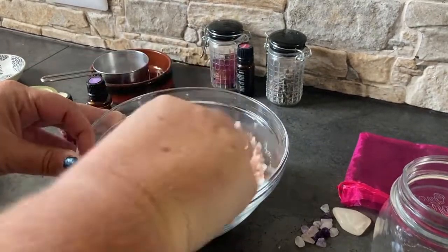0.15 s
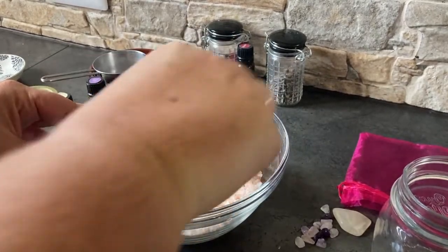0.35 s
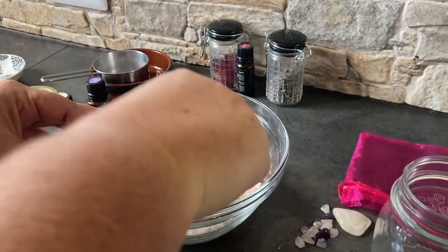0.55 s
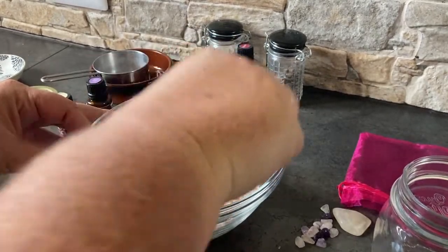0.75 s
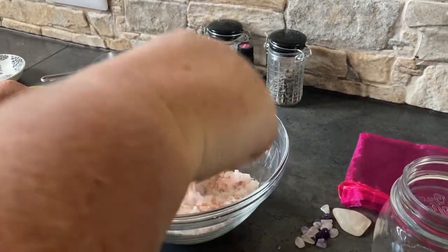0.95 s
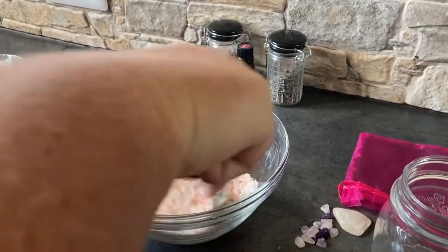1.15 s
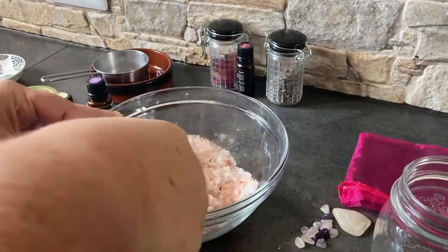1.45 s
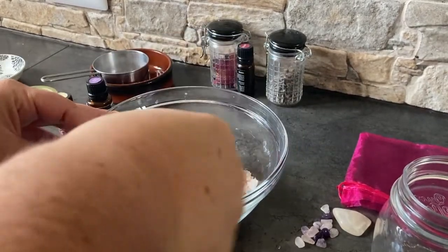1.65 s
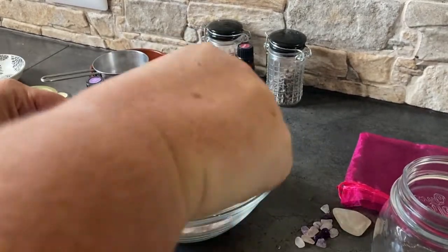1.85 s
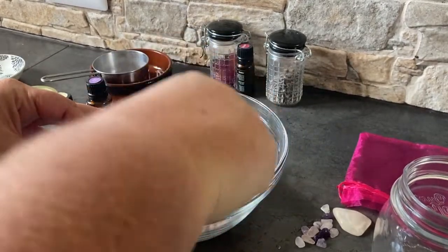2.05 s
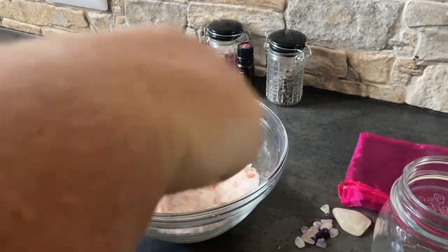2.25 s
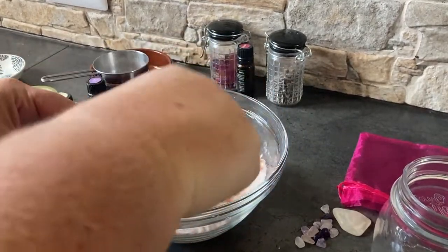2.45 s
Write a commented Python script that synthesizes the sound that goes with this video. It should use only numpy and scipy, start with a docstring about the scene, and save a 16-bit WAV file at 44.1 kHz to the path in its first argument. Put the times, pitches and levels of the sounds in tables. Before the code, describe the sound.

Coarse salt is stirred by hand in a glass bowl. A hard crunch with clustered knocks comes at 0.1 s, then grinding pushes near 0.5 and 0.8 s. Around 1.0-1.3 s crystals hiss and scrape the glass with short damped rings. A dull thud lands at 1.5 s, softer crunches at 2.0 and 2.3 s. Close, dry stereo, small room, faint rumble.

```python
"""Coarse salt stirred in a glass bowl

A hand stirs salt on a kitchen counter, about three strokes a second. Each push makes the packed salt
crunch low: random grain slips drive the bowl's resonances. Now and then it gives way with a thud, a smooth
pulse into the same resonances. Loose crystals hiss and tick (shaped noise and grains); those dragged along
the wall ring damped glass modes. A faint rumble, a sagging tone, air noise and a small room lie behind."""
import sys
import numpy as np
from scipy import signal
from scipy.fft import rfft, irfft
from scipy.io import wavfile

SR = 44100
rng = np.random.default_rng(int(sys.argv[2]) if len(sys.argv) > 2 else 0)


def generate_wav(signal):
    """Clip the signal to [-1, 1] and save it as 16-bit WAV at the path in sys.argv[1]."""
    frames = np.transpose(np.atleast_2d(signal))
    scaled = np.clip(frames, -1, 1) * 32767
    pcm = np.round(scaled).astype(np.int16)
    wavfile.write(sys.argv[1], SR, pcm)


N = 114660
SIZE = 2 ** 17  # FFT length, samples
FREQS_HZ = np.arange(SIZE // 2 + 1) * SR / SIZE
TIME_S = np.arange(N) / SR

# All levels are relative: later gains apply.
# air noise spectrum [f/Hz, density/dB]
AIR_SPECTRUM = [(20, -17), (80, -37), (250, -12), (1000, -6), (3000, -28), (16000, -21)]
# low rumble of bowl on counter [t/s, level/dB]
RUMBLE_LEVEL = [(0.0, -53), (0.03, -46), (0.15, -45), (0.35, -86), (0.4, -52.5), (0.46, -42), (0.51, -43),
                (0.66, -66.5), (0.72, -55), (0.83, -41), (0.92, -96), (0.98, -47.5), (1.04, -53),
                (1.11, -50), (1.18, -46), (1.3, -50.5), (1.32, -54), (1.38, -52), (1.49, -43.5),
                (1.61, -52), (1.77, -60.5), (1.82, -83), (1.88, -64), (1.95, -49.5), (2.01, -41),
                (2.04, -52), (2.07, -42), (2.19, -76), (2.27, -38), (2.32, -37), (2.53, -65), (2.6, -42.5)]
# rumble spectrum [f/Hz, density/dB]
COUNTER_SPECTRUM = [(20, -43), (42, -24.5), (68, -3), (90, -10.5), (130, -10), (400, -26), (2000, -123)]
# brief low tone: one row [centre t/s, f/Hz, glide/(Hz/s), half length/s, level/dB]
LOW_TONE = (.965, 114, -130, .035, -50)
# glass rubbed by salt [t/s, level/dB]
RUB_LEVEL = [(0, -52.5), (.3, -70), (.98, -87), (1.03, -43), (1.18, -43.5), (1.22, -46.5), (1.3, -62),
             (1.35, -57), (1.44, -53), (1.55, -60), (1.68, -62), (1.8, -51.5), (2.0, -65), (2.25, -58),
             (2.6, -80)]
# crystals catch on the glass wall [t/s, level/dB, length/s]
WALL_SCRAPES = [(.062, -44, 0.0061), (1.095, -31, 0.008), (1.155, -38, 0.0087), (1.254, -38.5, 0.016),
                (1.29, -31, 0.0062), (1.303, -31, 0.0035), (1.627, -45.5, 0.012), (1.738, -52, 0.011),
                (1.79, -54, 0.011), (1.83, -50, 0.014), (1.883, -48.5, 0.0031), (2.1, -56, 0.0072),
                (2.13, -48.5, 0.013)]
# a crystal taps the glass [t/s, level/dB]
GLASS_TAPS = [(1.065, -49), (1.099, -54), (1.1533, -32.5), (1.585, -58), (1.769, -50.5)]
# glass modes, damped by the salt [f/Hz, width/Hz, level/dB]
GLASS_MODES = [(1680, 55, -7.5), (2800, 200, -14), (4660, 103, 6.5), (4615, 450, -7), (6580, 69, -2),
               (7660, 200, -7)]
# lowest ring of the glass while salt drags round the wall [t/s, level/dB]
LOW_RING_LEVEL = [(0, -62.5), (1.01, -93), (1.035, -47.5), (1.17, -56), (1.22, -67), (1.315, -50),
                  (1.355, -86), (1.42, -58.5), (1.6, -66), (1.7, -72), (1.765, -64), (1.85, -97),
                  (2.6, -61)]
# its modes [f/Hz, width/Hz, level/dB]
LOW_RING_MODES = [(1650, 94, 0), (1660, 390, -4.5)]
# hiss of sliding crystals [t/s, level/dB]
SLIDE_LEVEL = [(0, -42), (.11, -41.5), (.14, -46), (.2, -46), (.28, -52.5), (.34, -72), (.374, -69),
               (.382, -44.5), (.47, -41), (.56, -52), (.615, -53), (.665, -65), (.708, -72), (.714, -38.5),
               (.775, -37.5), (.84, -45), (.96, -62.5), (1.015, -69), (1.023, -34.5), (1.08, -39.5),
               (1.12, -34.5), (1.27, -43), (1.305, -34.5), (1.325, -45), (1.56, -48.5), (1.69, -49.5),
               (1.74, -40), (1.81, -52.5), (1.89, -48.5), (1.965, -38.5), (2.06, -50.5), (2.22, -46),
               (2.295, -36.5), (2.4, -50), (2.6, -45)]
# hiss and tick spectrum [f/Hz, density/dB]
HISS_SPECTRUM = [(300, -14), (800, -9), (1500, -5), (2700, -4), (3500, -6), (4300, -5), (5500, -4),
                 (6500, -3), (7300, -2), (8200, 1.5), (8800, 7.5), (9500, 1), (10700, 1), (11300, 5.5),
                 (12100, 6.5), (13400, -5), (14600, 0), (16000, -4)]
# single crystals crack [t/s, level/dB, length/s]
CRYSTAL_TICKS = [(.1146, -46, 0.0015), (.1185, -28.5, 0.00076), (.1312, -22.5, 0.0019), (.378, -63, 0.002),
                 (.7107, -37.5, 0.0019), (.718, -44.5, 0.013), (1.021, -34, 0.0048),
                 (1.586, -38.5, 0.00081), (1.625, -43, 0.003), (1.8265, -41, 0.0023)]
# lumps shear apart as a stroke digs in [t/s, level/dB, length/s]
LUMP_SHEARS = [(.103, -42, 0.032), (.26, -64, 0.021), (.388, -53.5, 0.096), (.6, -63.5, 0.018),
               (.716, -49, 0.019), (.765, -51.5, .03), (1.945, -52.5, 0.024), (2.28, -60, 0.016)]
# resonances excited by shearing [f/Hz, width/Hz, level/dB]
SHEAR_RESONANCES = [(2754, 350, -9.5), (4200, 120, -12), (5600, 480, 1), (8350, 550, -35.5),
                    (11380, 1200, -1.5)]
# packed salt gives way and knocks the bowl [t/s, level/dB, contact/s]
SALT_THUDS = [(.1168, -24, 0.0014), (.1203, -25.5, 0.0011), (.1268, -25.5, 0.0014), (.1335, -22.5, 0.00034),
              (.137, -21.5, 0.00024), (.142, -41, 0.0046), (.802, -31, 0.00087), (.8062, -23, 0.00095),
              (.812, -28, 0.0015), (1.033, -34.5, 0.00086), (1.038, -29.5, 0.0033), (1.0512, -27.5, 0.0031),
              (1.0605, -37, 0.0025), (1.112, -31.5, 0.0021), (1.4762, -35, 0.00099), (1.4803, -20, 0.0037),
              (1.486, -21, 0.004), (1.4915, -41, 0.0072), (1.5315, -31.5, 0.0029), (1.536, -37, 0.0033),
              (1.972, -26, 0.0032), (1.9815, -31, 0.0021), (1.9915, -28, 0.0037), (2.002, -25.5, 0.0023),
              (2.011, -33, 0.0014), (2.3015, -33, 0.0012), (2.3062, -35, 0.0015), (2.3115, -35, 0.0032)]
# pushes into the salt [peak t/s, level/dB, rise/(dB/s), fall/(dB/s), grinding re push/dB]
HAND_PUSHES = [(0.134, -26.5, 414, 128, 2.5), (.205, -33, 500, 259, -2), (0.485, -34.5, 224, 157, 4),
               (0.736, -35, 1300, 306, -22), (0.808, -30.5, 302, 160, 2.5), (1.044, -30.5, 803, 232, -12),
               (1.123, -38.5, 298, 42, -29), (1.313, -42.5, 298, 250, 6), (1.492, -40.5, 447, 120, -18),
               (1.97, -34.5, 510, 130, 1), (2.068, -43, 400, 400, -14), (2.298, -34.5, 288, 149, 3.5),
               (2.6, -52.5, 20, 150, 10.5)]
# a lump splits with a coarse crunch [t/s, level/dB, length/s]
LUMP_SPLITS = [(.1312, -9.5, 0.0057), (.722, -61, 0.0066), (1.035, -50, 0.01), (2.293, -34, 0.0049)]
# grinding spectrum [f/Hz, density/dB]
GRIND_SPECTRUM = [(30, -85), (100, -26), (450, -11), (700, 0.5), (1050, -22), (1600, -33), (2200, -11.5),
                  (4000, -13.5), (8000, -12.5), (16000, -54)]
# resonances of loaded bowl and counter [f/Hz, width/Hz, level/dB]
BODY_MODES = [(124, 120, 6), (194.6, 33, 6.5), (318.2, 23.6, 9), (526.3, 34, 6), (710, 13.3, -5),
              (931, 33, 0), (1106, 15, -10.5), (1377, 117, -15)]
# phase between microphones [f/Hz, left lead/rad]
LEFT_LEAD = [(100, -.1), (250, .1), (345, .8), (520, -.6), (700, 0), (1000, .6), (1640, .9), (2600, 2.6),
             (3900, 2.1), (4650, 0), (5600, -3.3), (6600, -5.8), (9000, -9.4), (16000, -20)]
# balance between microphones [f/Hz, left minus right/dB]
LEFT_LEAN = [(60, -1.5), (120, -2), (300, 1.5), (800, 2), (1500, 2.5), (3000, 1), (4700, 1), (8000, 0.5)]
# unlikeness of scattered grains at the microphones [f/Hz, side minus mid/dB]
STEREO_WIDTH = [(50, -19), (170, -15), (300, -4), (550, -7), (1000, -3), (2500, -4), (4700, -6),
                (8000, -15), (9000, -24), (11000, -12), (15000, -11)]

AIR_DB, RUMBLE_DB, GLASS_DB, HISS_DB, TICK_DB = -76, 0.5, -8.5, -8, -2
THUD_DB, BODY_DB, CRUNCH_DB, THUD_GRIT_DB = 1.5, -4.5, -20, -10.5
SLIPS_PER_S, RUBS_PER_S, CRUSHES_PER_S, GRAINS_PER_S = 2700, 2000, 2400, 6500
SCRAPE_RELEASE_S, SHEAR_RELEASE_S, TICK_RELEASE_S, CRUNCH_RELEASE_S = 0.0026, 0.012, 0.00011, 0.0024
TAP_CONTACT_S, BLOW_GAIN = 0.0001, np.sqrt(0.0062 * SR)
BODY_ROLLOFF_HZ, GRAIN_BAND_HZ, LOW_CUT_HZ, TOP_HZ = 1660, 3200, 66, 15900
ROOM_T60_S, ROOM_DB, NEAR_T60_S, NEAR_DB = 0.3, -21, 0.02, -16
LEFT_LAG_S = 0.000268  # loose salt lies nearer the right microphone


def undb(db):
    """Decibels to amplitude gain."""
    return 10 ** (np.asarray(db) / 20)


def unit(x):
    """Scale to rms 1."""
    return x / np.sqrt(np.mean(x ** 2))


def unit_power(response):
    """Scale a frequency response to mean power 1."""
    return response / np.sqrt(np.mean(abs(response) ** 2))


def curve(rows):
    """Gain over time, interpolated in dB."""
    return undb(np.interp(TIME_S, *np.array(rows).T))


def across(rows):
    """Table values at every spectrum frequency, interpolated on log f."""
    hz, value = np.array(rows, float).T
    return np.interp(np.log(FREQS_HZ + 1), np.log(hz), value)


def filtered(x, response):
    """Apply a frequency response."""
    return irfft(rfft(x, SIZE) * response)[..., :N]


def colour(rows):
    """Minimum-phase response of the given spectrum, via the folded cepstrum; unit power."""
    cepstrum = irfft(np.log(undb(across(rows))))
    cepstrum[1:SIZE // 2] *= 2
    cepstrum[SIZE // 2 + 1:] = 0
    return unit_power(np.exp(rfft(cepstrum)))


def resonances(rows, order=1):
    """Unit-power sum of band-pass modes; higher order steepens the skirts."""
    h = 0
    for hz, width_hz, db in rows:
        damping = 1j * FREQS_HZ * width_hz
        h = h + undb(db) * (damping / (hz ** 2 - FREQS_HZ ** 2 + damping)) ** order
    return unit_power(h)


def grains(rate_per_s, spread_db):
    """Random single-sample impacts of uneven size and random sign, rms 1."""
    hit = rng.random(N) < rate_per_s / SR
    size_db = spread_db * np.clip(rng.standard_normal(N), -2, 2)
    return unit(hit * rng.choice([-1, 1], N) * undb(size_db))


def flutter(rate_hz, depth_db):
    """Gain wavering at random between knots at rate_hz."""
    knots = rng.standard_normal(N)
    return undb(depth_db * np.interp(TIME_S * rate_hz, np.arange(N), knots))


def placed(events, shape):
    """Sum of short sounds: each (t, dB, x) row plays shape(age, x)."""
    out, age_s = np.zeros(SIZE), np.arange(SR // 8) / SR
    for t_s, db, x in events:
        start = int(max(t_s, 0) * SR)
        out[start:start + len(age_s)] += undb(db) * shape(age_s, x)
    return out[:N]


def bursts(rows, release_s):
    """Event envelope: sudden start, hold for its length, exponential release."""
    def hold_release(age_s, length_s):
        return np.exp(-np.maximum(age_s - length_s, 0) / release_s)

    return placed(rows, hold_release)


def blows(rows):
    """Raised-cosine force pulses; a longer contact is duller."""
    def pulse(age_s, contact_s):
        phase = np.pi * np.minimum(age_s / contact_s, 1)
        return 2 * np.sin(phase) ** 2 / (contact_s * SR)

    return BLOW_GAIN * placed(rows, pulse)


def air():
    """Steady coloured noise, independent at each microphone."""
    return undb(AIR_DB) * filtered(rng.standard_normal((2, N)), colour(AIR_SPECTRUM))


def echoes(x, t60_s, low_hz):
    """Diffuse reflections: decaying noise without deep bass, different at each microphone."""
    tail = rng.standard_normal((2, N)) * np.exp(-np.log(1000) * TIME_S / t60_s)
    tail = signal.sosfilt(signal.butter(2, low_hz, "high", fs=SR, output="sos"), tail)
    tail = tail / np.sqrt(np.sum(tail ** 2, axis=1, keepdims=True))
    return filtered(x, rfft(tail, SIZE))


def rumble():
    """The bowl shifts on the counter under the hand: low-coloured grains."""
    slips = curve(RUMBLE_LEVEL) * grains(SLIPS_PER_S, spread_db=1.5)
    return undb(RUMBLE_DB) * filtered(slips, colour(COUNTER_SPECTRUM))


def groan():
    """A faint low tone that sags between two strokes: gliding sine, Gaussian envelope."""
    centre_s, hz, glide_hz_per_s, half_s, db = LOW_TONE
    t = TIME_S - centre_s
    tone = np.sin(2 * np.pi * (hz + glide_hz_per_s * t / 2) * t)
    return undb(db) * np.exp(-(t / half_s) ** 2 / 2) * tone


def glass():
    """Crystals dragged along the wall ring its damped modes."""
    rub = curve(RUB_LEVEL) * grains(RUBS_PER_S, spread_db=2.5)
    catch = bursts(WALL_SCRAPES, SCRAPE_RELEASE_S) * grains(GRAINS_PER_S, spread_db=-2.5)
    drag = curve(LOW_RING_LEVEL) * grains(GRAINS_PER_S, spread_db=-2.5)
    low = filtered(drag, resonances(LOW_RING_MODES, order=2))
    return undb(GLASS_DB) * filtered(rub + catch, resonances(GLASS_MODES, order=2)) + low


def speckle():
    """Tiny collisions, each with its own pitch range: every band has its own grains and flicker."""
    out = 0
    for hz in np.arange(0, TOP_HZ + GRAIN_BAND_HZ, GRAIN_BAND_HZ):
        # overlapping bands, power sums to 1
        band = np.sqrt(np.maximum(1 - abs(FREQS_HZ - hz) / GRAIN_BAND_HZ, 0))
        collisions = grains(GRAINS_PER_S, spread_db=5) * flutter(rate_hz=120, depth_db=3)
        out = out + filtered(collisions, band)
    return unit(out)


def shear_rings():
    """Shearing lumps excite each resonance with its own grains."""
    envelope = bursts(LUMP_SHEARS, SHEAR_RELEASE_S)
    out = 0
    for mode in SHEAR_RESONANCES:
        drive = envelope * grains(RUBS_PER_S, spread_db=8.5)
        out = out + undb(mode[2]) * filtered(drive, resonances([mode], order=2))
    return out


def loose_salt():
    """Dense tiny collisions of sliding crystals, a few sharp cracks, and ringing where lumps shear."""
    slide = undb(HISS_DB) * curve(SLIDE_LEVEL) * flutter(rate_hz=120, depth_db=-0.26) * speckle()
    cracks = undb(TICK_DB) * bursts(CRYSTAL_TICKS, TICK_RELEASE_S) * rng.standard_normal(N)
    return filtered(slide + cracks, colour(HISS_SPECTRUM)) + shear_rings()


def loaded_bowl():
    """Unit-power response of the bowl on the counter; its load of salt muffles the top."""
    ratio = FREQS_HZ / BODY_ROLLOFF_HZ
    return unit_power(resonances(BODY_MODES) / (1 + 1.4j * ratio - ratio ** 2))


def thuds():
    """Blunt blows through the salt ring the loaded bowl; hard taps ring the glass."""
    taps = blows([(t_s, db, TAP_CONTACT_S) for t_s, db in GLASS_TAPS])
    knocks = filtered(blows(SALT_THUDS), loaded_bowl())
    return undb(THUD_DB) * knocks + filtered(taps, resonances(GLASS_MODES, order=2))


def crunch():
    """Packed crystals slip and shake the bowl, others grind, lumps split; thuds loosen a few more."""
    pushes, grinds = [], []
    for peak_s, db, rise, fall, grinding_db in HAND_PUSHES:
        drop_db = np.maximum((peak_s - TIME_S) * rise, (TIME_S - peak_s) * fall)
        pushes.append(undb(db - drop_db))
        grinds.append(pushes[-1] * undb(grinding_db))
    uneven = flutter(rate_hz=70, depth_db=2)
    # strongest push wins at each instant
    force = np.max(pushes, axis=0) * uneven
    force = force + undb(THUD_GRIT_DB) * bursts(SALT_THUDS, CRUNCH_RELEASE_S)
    grinding = np.max(grinds, axis=0) * uneven + bursts(LUMP_SPLITS, CRUNCH_RELEASE_S)
    body = filtered(force * grains(SLIPS_PER_S, spread_db=-2.5), loaded_bowl())
    grind = filtered(grinding * grains(CRUSHES_PER_S, spread_db=0.5), colour(GRIND_SPECTRUM))
    return undb(BODY_DB) * body + undb(CRUNCH_DB) * grind


def salt():
    """Everything that the moving grains set off in the bowl."""
    return rumble() + glass() + crunch()


def heard(centre, scatter, lead_rad):
    """Two microphones: shared centre, opposite-signed scatter, then level and phase offsets."""
    sides = np.array([[1], [-1]])  # left, right
    pair = centre + sides * filtered(scatter, undb(across(STEREO_WIDTH)))
    balance = undb(sides * across(LEFT_LEAN) / 2)
    return filtered(pair, balance * np.exp(1j * sides * lead_rad / 2))


def scene():
    """The bowl close to two microphones, with near and room reflections and air noise."""
    bowl, hiss = salt() + thuds() + groan(), loose_salt()
    # fresh grains serve as scatter
    direct = heard(bowl, salt(), across(LEFT_LEAD))
    direct = direct + heard(hiss, loose_salt(), -2 * np.pi * FREQS_HZ * LEFT_LAG_S)
    near = undb(NEAR_DB) * echoes(bowl, NEAR_T60_S, low_hz=263)
    room = undb(ROOM_DB) * echoes(bowl + hiss, ROOM_T60_S, low_hz=209)
    return air() + room + near + direct


def record(dry):
    """Cut the deep bass gently and the top steeply."""
    dry = signal.sosfilt(signal.butter(3, LOW_CUT_HZ, "high", fs=SR, output="sos"), dry)
    return signal.sosfilt(signal.ellip(10, 0.2, 80, TOP_HZ, fs=SR, output="sos"), dry)


dry = scene()
out = record(dry)
generate_wav(out)
```